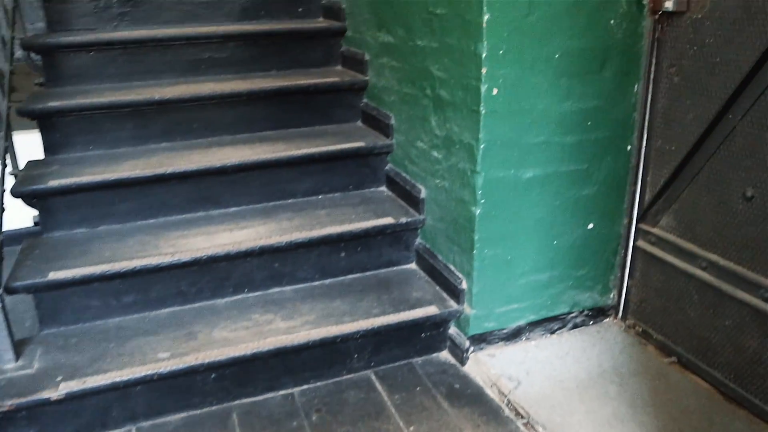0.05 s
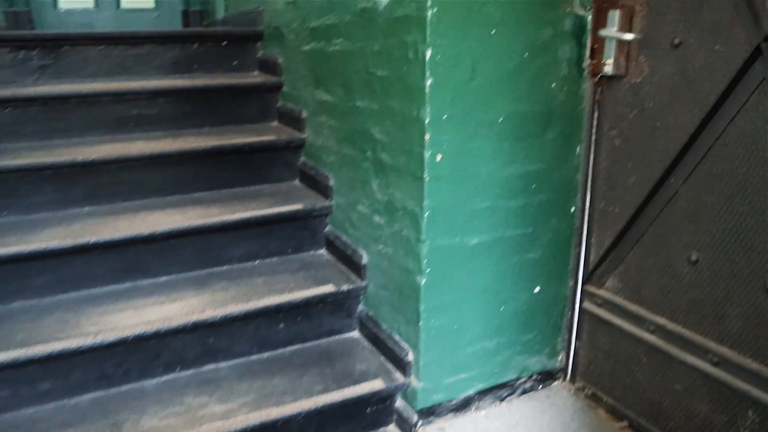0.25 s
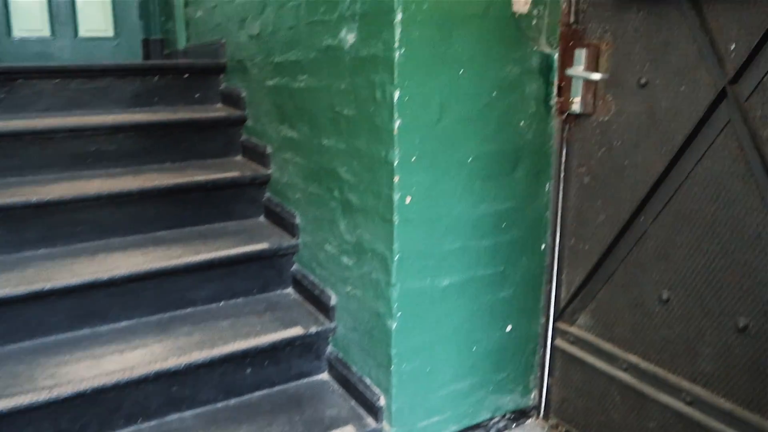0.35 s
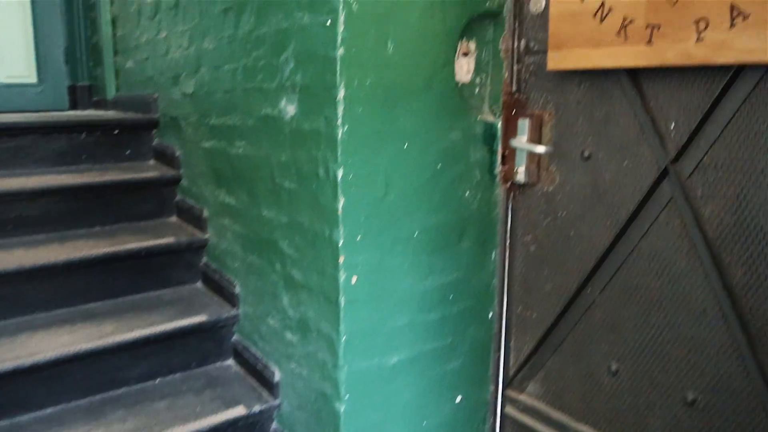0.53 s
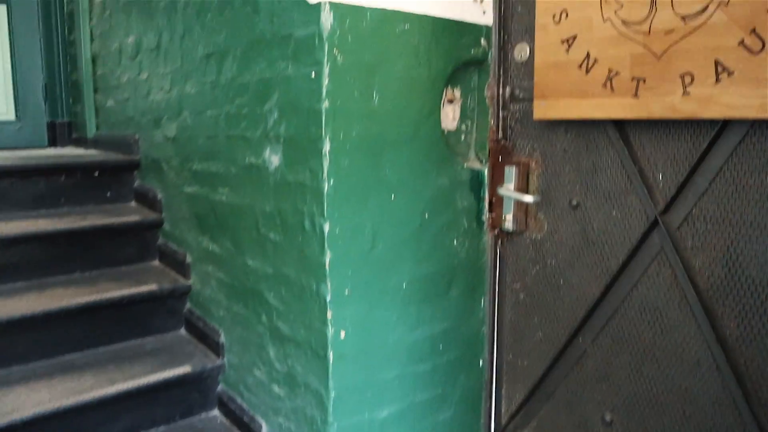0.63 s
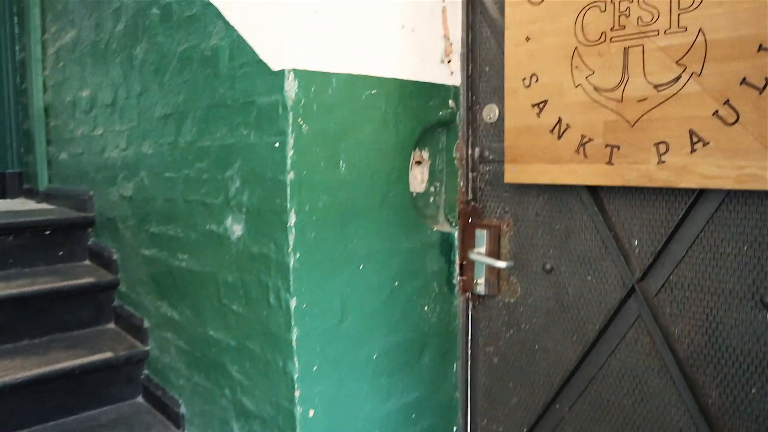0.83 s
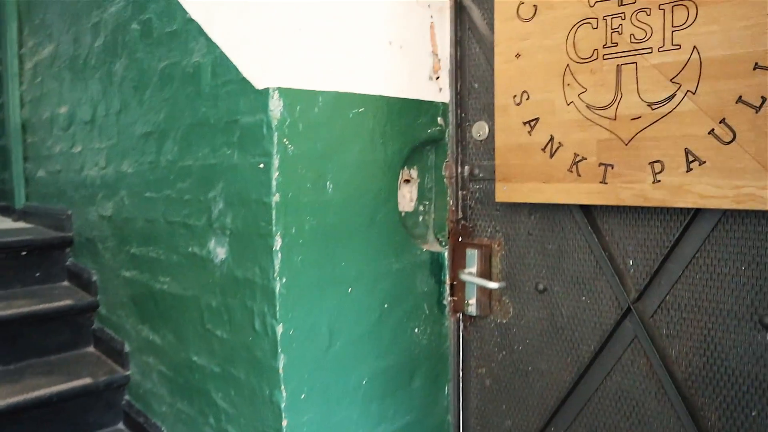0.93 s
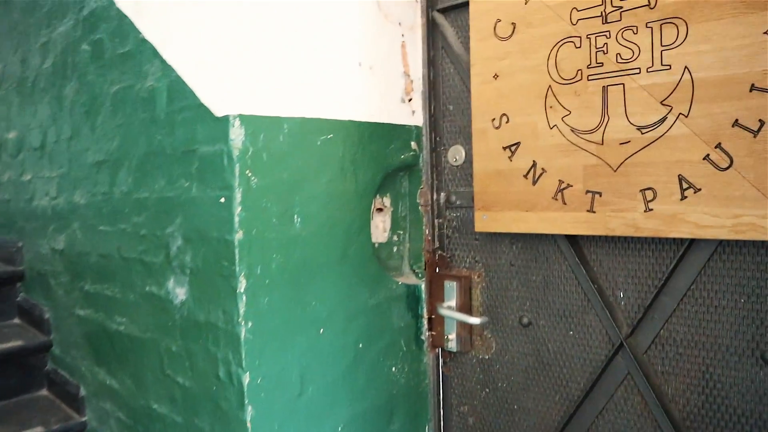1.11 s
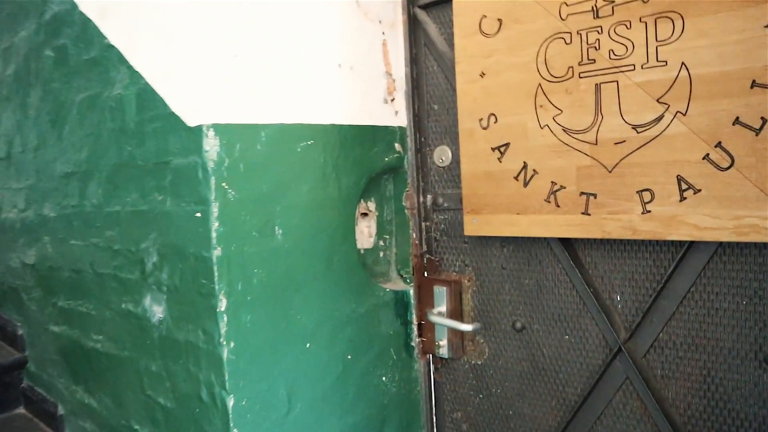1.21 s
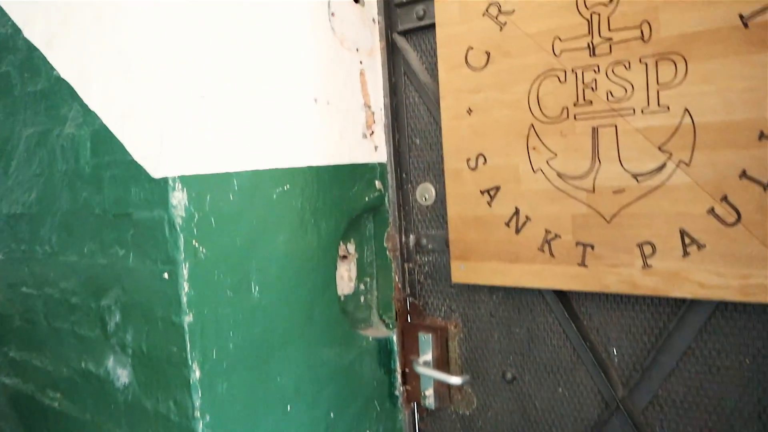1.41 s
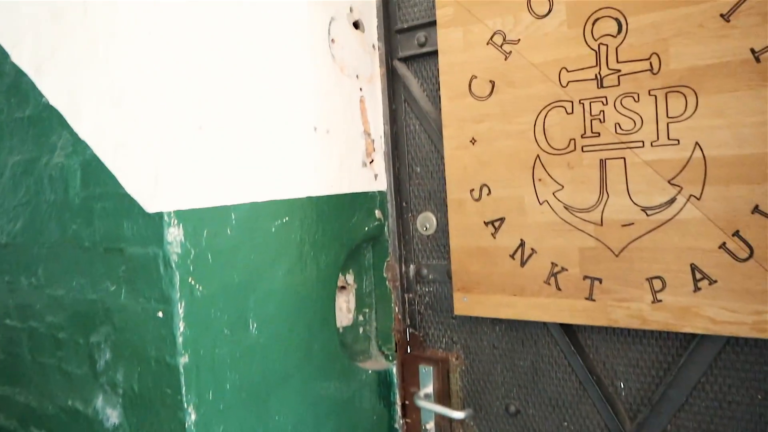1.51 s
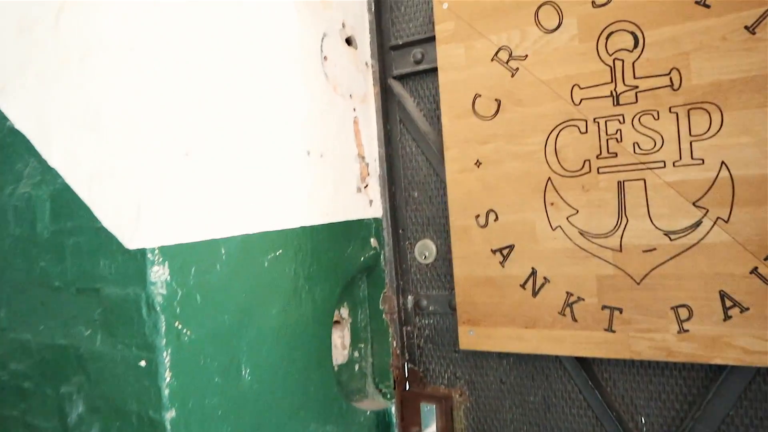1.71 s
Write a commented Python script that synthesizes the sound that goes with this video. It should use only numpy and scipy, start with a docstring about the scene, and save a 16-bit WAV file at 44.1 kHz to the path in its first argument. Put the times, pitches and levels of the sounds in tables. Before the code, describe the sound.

A dull footfall on a wooden floor rings through a stairwell, followed by a quiet step.

```python
"""A stairwell with hard plastered walls, where someone walks along the wooden floor.
Clothing swishes with each stride over steady room hiss, and a few low bumps reach the microphone.
One heavy footfall scuffs, then knocks a dull thud out of the boards that rings on in the stairwell.
A softer step follows."""
import sys
import numpy as np
from scipy import signal
from scipy.fft import rfft, irfft
from scipy.io import wavfile

SR = 44100
rng = np.random.default_rng(int(sys.argv[2]) if len(sys.argv) > 2 else 0)


def wrap_up_sound(samples):
    """Save the sound to the file named by the first command line argument, as 16-bit audio."""
    columns = np.atleast_2d(samples).T
    # keep every value between -1 and 1, then stretch to whole-number steps
    tamed = np.clip(columns, -1, 1)
    steps = np.round(tamed * 32767).astype(np.int16)
    wavfile.write(sys.argv[1], SR, steps)


N = 77175
TIME_S = np.arange(N) / SR
FREQ_HZ = np.maximum(np.fft.rfftfreq(N, 1 / SR), 1)


def from_db(db):
    """Decibels to gain."""
    return 10 ** (np.asarray(db) / 20)


def unit_rms(x):
    """Scale to rms 1."""
    return x / np.sqrt(np.mean(x ** 2) + 1e-20)


def gain_curve(rows):
    """Gain per sample from (time_s, level_db) rows."""
    return from_db(np.interp(TIME_S, *np.transpose(rows)))


def noise(spectrum):
    """Noise of rms 1 shaped by (freq_hz, relative_db) rows, rolled off beyond both ends."""
    hz, db = np.transpose(spectrum)
    colour = from_db(np.interp(np.log(FREQ_HZ), np.log(hz), db))
    skirts = np.minimum(FREQ_HZ / hz[0], 1) ** 2 * np.minimum(hz[-1] / FREQ_HZ, 1) ** 2
    return unit_rms(irfft(rfft(rng.standard_normal(N)) * skirts * colour, N))


def butter(x, hz, kind, order):
    """Butterworth filter."""
    return signal.sosfilt(signal.butter(order, hz, kind, fs=SR, output="sos"), x + 1e-18)


def decay(start_s, t60_s, build_s=1e-6):
    """Envelope with exponential build-up and decay."""
    age_s = np.maximum(TIME_S - start_s, 0)
    return (1 - np.exp(-age_s / build_s)) * np.exp(-np.log(1000) * age_s / t60_s)


def swell(start_s, length_s, rise_share):
    """Envelope with quarter-sine rise and fall."""
    corners_s = [start_s, start_s + rise_share * length_s, start_s + length_s]
    return np.sin(np.pi / 2 * np.interp(TIME_S, corners_s, [0, 1, 0]))


def sine(start_s, pitch_hz):
    """Sine with zero phase at start_s."""
    return np.sin(2 * np.pi * pitch_hz * (TIME_S - start_s))


def strike(contacts, modes):
    """Each contact rings all modes of the wood; the soft sole cuts the treble steeply."""
    sound = np.zeros(N)
    for start_s, level_db, lowpass_hz in contacts:
        ring = sum(from_db(db) * sine(start_s, hz) * decay(start_s, t60_s) for hz, db, t60_s in modes)
        sound += from_db(level_db) * butter(ring, lowpass_hz, "low", order=5)
    return sound


# Hiss and rumble of the building: freq_hz, relative_db
AIR_SPECTRUM = [(25, 8), (45, -3), (70, -2.5), (110, -4.5), (150, -2), (210, -5), (400, -7), (800, -7),
                (1300, -13.5), (2500, -22), (6000, -33.5), (15500, -41.5)]
# Drift of the hiss and rumble: time_s, relative_db
AIR_DRIFT = [(0, 1), (.5, -1.5), (.85, -0.5), (1.05, -0.5), (1.3, 3), (1.75, 1)]
# Drone envelope: time_s, level_db
DRONE_ENVELOPE = [(0, -43), (.2, -45.5), (.5, -65), (.8, -55), (1.0, -52), (1.3, -55), (1.75, -57)]
AIR_DB, DRONE_HZ, DRONE_WIDTH_HZ = -41, 145.8, 3.7


def room_air():
    """The building's air hisses and rumbles; one narrow resonance gives a wavering drone."""
    resonance = 1 / (1 + ((FREQ_HZ - DRONE_HZ) / (DRONE_WIDTH_HZ / 2)) ** 2)
    drone = unit_rms(irfft(rfft(rng.standard_normal(N)) * resonance, N))
    hiss = from_db(AIR_DB) * noise(AIR_SPECTRUM)
    return gain_curve(AIR_DRIFT) * hiss + gain_curve(DRONE_ENVELOPE) * drone


# Cloth friction: freq_hz, relative_db
CLOTH_SPECTRUM = [(900, -4.5), (2000, -0.5), (3500, 0), (5500, -1), (8500, -3), (9800, -7), (12500, -10),
                  (15500, -15.5)]
# Swish envelope: time_s, level_db
SWISH_ENVELOPE = [(0, -45.5), (.11, -50), (.2, -53.5), (.31, -58.5), (.38, -52), (.51, -58.5), (.62, -53.5),
                  (.74, -53.5), (.83, -46), (.915, -41), (1.0, -46), (1.07, -49), (1.14, -47.5),
                  (1.19, -46), (1.33, -47), (1.47, -50), (1.57, -47.5), (1.75, -53)]
# Swish brightness, as treble boost and equal bass cut: time_s, tilt_db
SWISH_TILT = [(0, 4.5), (.5, -3), (.9, .5), (1.1, 0.5), (1.3, -2.5), (1.75, -5.5)]
TILT_PIVOT_HZ = 5000


def clothing():
    """Cloth rubs in time with the stride, shifting a little in brightness."""
    rub = noise(CLOTH_SPECTRUM)
    lows = irfft(rfft(rub) / (1 + (FREQ_HZ / TILT_PIVOT_HZ) ** 2), N)
    highs = rub - lows
    tilt = gain_curve(SWISH_TILT)
    return gain_curve(SWISH_ENVELOPE) * (lows / tilt + highs * tilt)


# Friction bursts: start_s, length_s, level_db, low_hz, high_hz
SCUFF_BURSTS = [(0.2266, 0.015, -20.5, 132, 740), (0.228, 0.011, -34.5, 1010, 2550),
                (0.229, 0.011, -46.5, 3000, 6000), (1.08, 0.023, -39, 1700, 2270),
                (1.081, 0.033, -45, 5970, 13900), (1.17, .024, -49.5, 4000, 7500)]


def scuffs():
    """Sole and cloth rub in short bursts of band noise."""
    sound = np.zeros(N)
    for start_s, length_s, level_db, low_hz, high_hz in SCUFF_BURSTS:
        friction = unit_rms(butter(rng.standard_normal(N), [low_hz, high_hz], "band", order=3))
        sound += from_db(level_db) * swell(start_s, length_s, rise_share=0.38) * friction
    return sound


# Low bumps: start_s, length_s, pitch_hz, level_db
LOW_BUMPS = [(0.229, 0.025, 55, -20.5), (0.587, 0.054, 44, -32), (0.593, .035, 80, -35),
             (1.109, 0.071, 37.8, -38), (1.17, 0.077, 161, -33), (1.35, 0.025, 126, -28),
             (1.368, 0.046, 78, -34), (1.439, 0.038, 82, -22), (1.478, 0.06, 109.6, -33.5),
             (1.614, 0.043, 43.4, -29.5), (1.64, 0.047, 102, -32)]


def bumps():
    """Walking and handling give bumps of a few slow cycles each, without a click."""
    return sum(from_db(level_db) * swell(start_s, length_s, rise_share=0.67) * sine(start_s, pitch_hz)
               for start_s, length_s, pitch_hz, level_db in LOW_BUMPS)


# Sole contacts of the heavy footfall: start_s, level_db, lowpass_hz
HEAVY_CONTACTS = [(0.2417, -8.5, 1270), (0.2447, 3.5, 1370), (0.2558, -19.5, 860)]
# Modes of the struck board: pitch_hz, relative_db, t60_s
BOARD_MODES = [(255, -33, .012), (357.5, -11, 0.053), (414, -2.5, 0.031), (501, -4.5, 0.06),
               (666, -9, 0.039), (734.5, -10, 0.056), (1130, -18.5, 0.023), (1380, -10, 0.0089),
               (1720, -5.5, 0.0083), (1810, -19, 0.068)]


def heavy_footfall():
    """Three quick sole contacts knock one dull thud out of the board."""
    return strike(HEAVY_CONTACTS, BOARD_MODES)


# Diffuse echo of the thud: freq_hz, early_relative_db, late_relative_db
ECHO_SPECTRA = [(60, -31, -34), (130, -10, -19.5), (205, -6, -15.5), (284, -3, -9), (456, 7, -5.5),
                (620, -4, -15), (726, -2, -11), (1040, -17.5, -25.5), (1940, -23.5, -45.5),
                (3180, -45.5, -68)]
# Strongest standing waves of the stairwell: pitch_hz, level_db, t60_s
STANDING_WAVES = [(173.3, -46, 1.35), (271, -31, 0.66), (329.6, -17.5, 0.49), (403, -42, 0.5),
                  (411.6, -28.5, 1.07), (457, -32, 0.21), (494, -29, 1.56), (519.7, -26.5, 1.16),
                  (572, -35, 1.5), (680, -36.5, 1.3), (741, -32.5, 0.78), (752, -31, 1.06),
                  (893, -48, 0.96)]
EARLY_DB, EARLY_T60_S, LATE_DB, LATE_T60_S = -18, 0.32, -25.5, 1.69
ECHO_DELAY_S, ECHO_BUILD_S = 0.010915, 0.006


def stairwell_echo():
    """The walls return the thud as dense early echoes, a long dull tail and standing waves."""
    start_s = HEAVY_CONTACTS[-1][0] + ECHO_DELAY_S
    early_noise = noise([(hz, db) for hz, db, _ in ECHO_SPECTRA])
    late_noise = noise([(hz, db) for hz, _, db in ECHO_SPECTRA])
    early = from_db(EARLY_DB) * early_noise * decay(start_s, EARLY_T60_S, ECHO_BUILD_S)
    late = from_db(LATE_DB) * late_noise * decay(start_s, LATE_T60_S, ECHO_BUILD_S)
    waves = sum(from_db(level_db) * sine(start_s, pitch_hz) * decay(start_s, t60_s, build_s=0.0074)
                for pitch_hz, level_db, t60_s in STANDING_WAVES)
    return early + late + waves


# Sole contacts of the soft step: start_s, level_db, lowpass_hz
SOFT_CONTACTS = [(1.0805, -20.5, 3200), (1.0852, -18, 1380), (1.0910, -28, 1000), (1.0968, -31, 930),
                 (1.117, -35, 610)]
# Modes of the flexing floor: pitch_hz, relative_db, t60_s
FLOOR_MODES = [(164, -3.5, 0.062), (264.6, -10, 0.058), (322, -10.5, 0.052), (482, -6.5, 0.041),
               (694, -18, .04), (1110, -17, 0.013), (1700, -14.5, .06)]
# Echo of the soft step: freq_hz, relative_db
STEP_ECHO_SPECTRUM = [(80, -13), (160, 14), (330, 6.5), (700, -11), (2000, -16.5), (5000, -26)]
STEP_ECHO_DB, STEP_ECHO_T60_S = -26, 0.44


def soft_step():
    """The other foot rolls onto the floor and flexes it, with a faint echo."""
    start_s = SOFT_CONTACTS[0][0]
    echo = noise(STEP_ECHO_SPECTRUM) * decay(start_s, STEP_ECHO_T60_S, ECHO_BUILD_S)
    return strike(SOFT_CONTACTS, FLOOR_MODES) + from_db(STEP_ECHO_DB) * echo


def scene():
    """All sources summed to mono."""
    footsteps = heavy_footfall() + stairwell_echo() + soft_step() + scuffs()
    return (footsteps + bumps() + clothing() + room_air())[None]


OVERLOAD_CEILING, DISTORTION_LOWPASS_HZ, CUTOFF_HZ = 0.95, 2320, 15800


def record(dry):
    """A slight overload rounds off the thud's peaks; a steep low-pass cuts the top treble."""
    saturated = OVERLOAD_CEILING * dry / (OVERLOAD_CEILING ** 6 + dry ** 6) ** (1 / 6)
    excess = dry - saturated
    distortion_lowpass = signal.butter(2, DISTORTION_LOWPASS_HZ, fs=SR, output="sos")
    rounded = dry - signal.sosfiltfilt(distortion_lowpass, excess + 1e-18)
    top_cut = signal.ellip(12, 0.1, 80, CUTOFF_HZ, fs=SR, output="sos")
    return signal.sosfilt(top_cut, np.clip(rounded, -1, 1))


dry = scene()
out = record(dry)
wrap_up_sound(out)
```